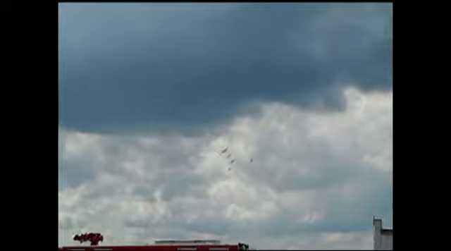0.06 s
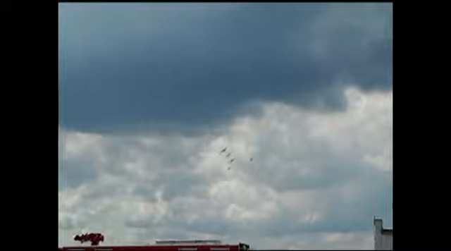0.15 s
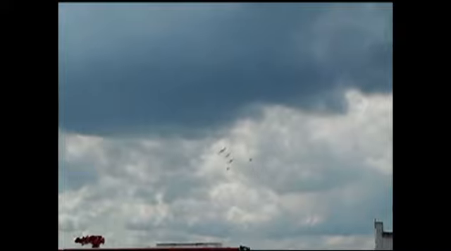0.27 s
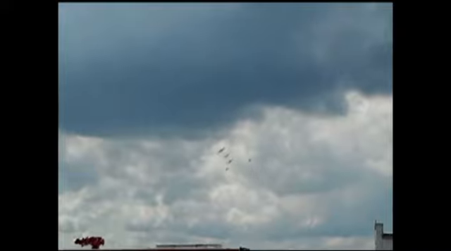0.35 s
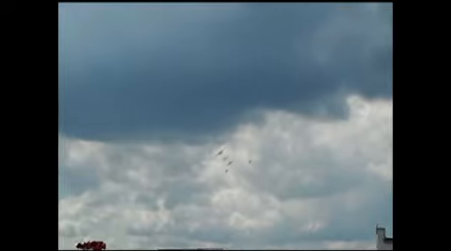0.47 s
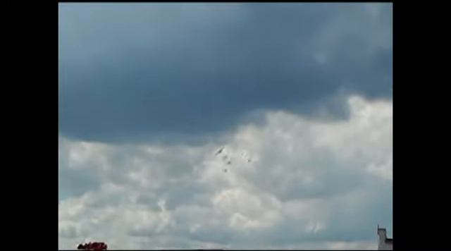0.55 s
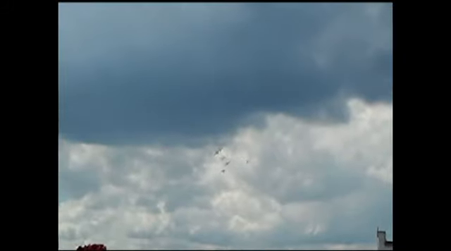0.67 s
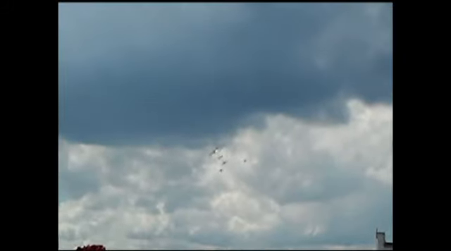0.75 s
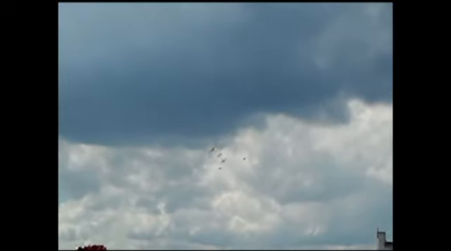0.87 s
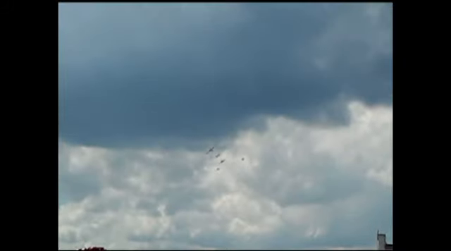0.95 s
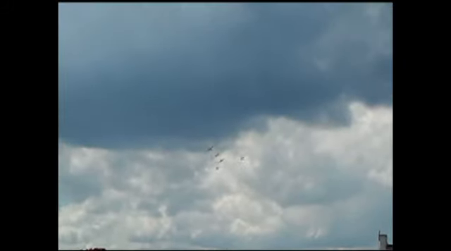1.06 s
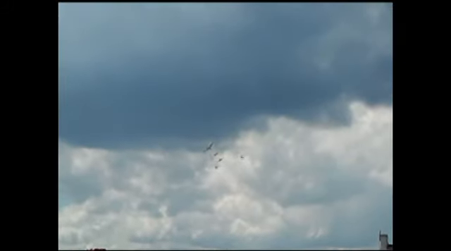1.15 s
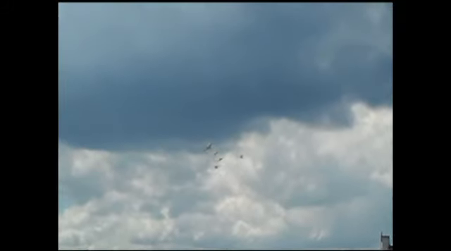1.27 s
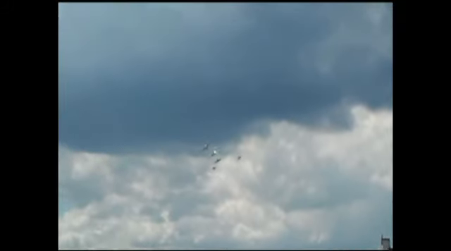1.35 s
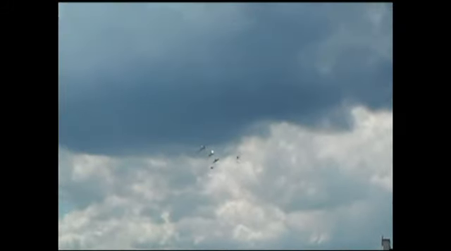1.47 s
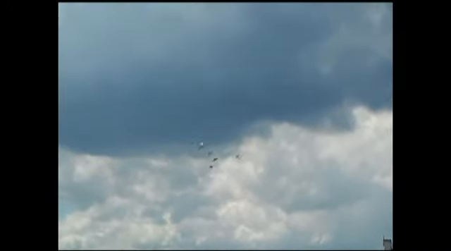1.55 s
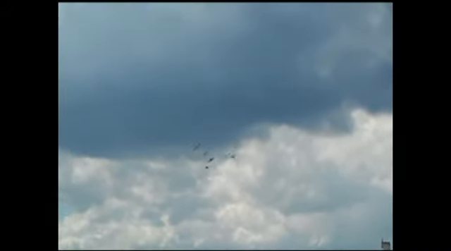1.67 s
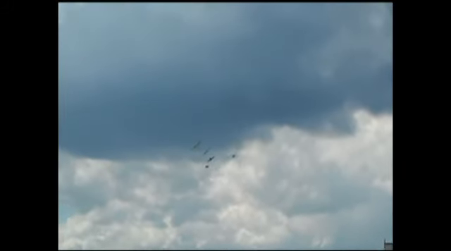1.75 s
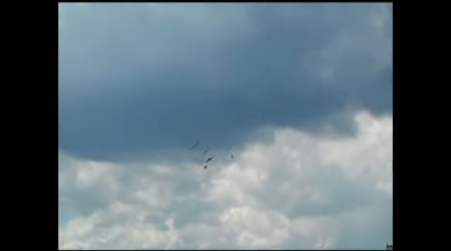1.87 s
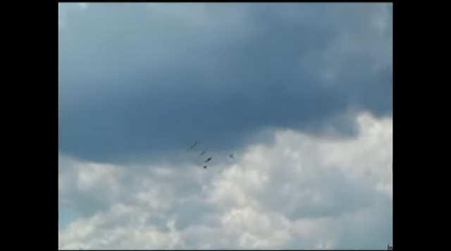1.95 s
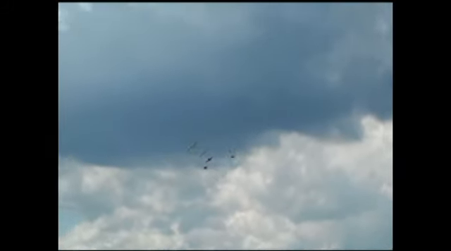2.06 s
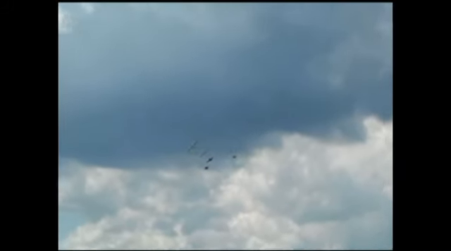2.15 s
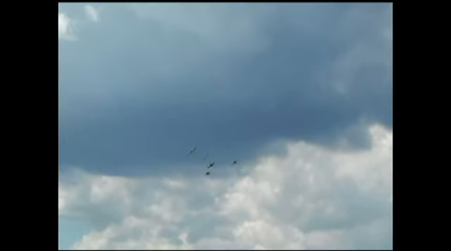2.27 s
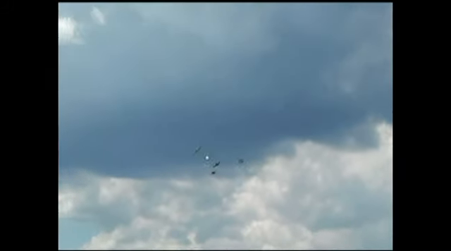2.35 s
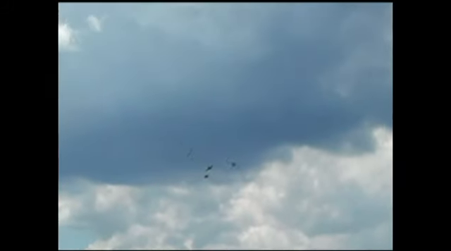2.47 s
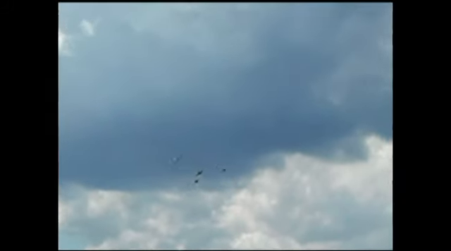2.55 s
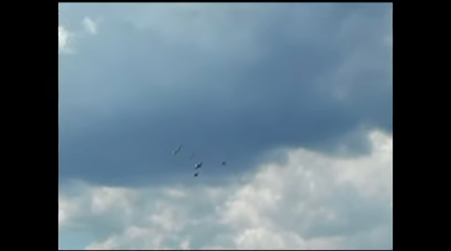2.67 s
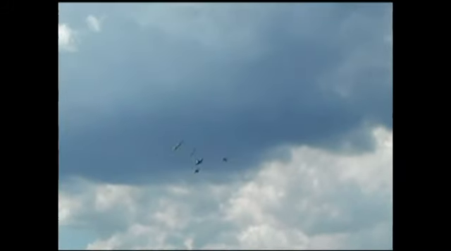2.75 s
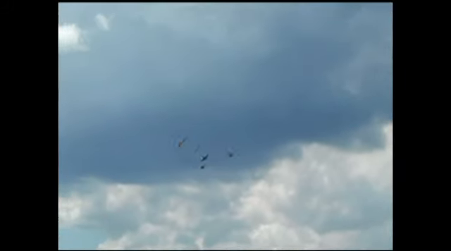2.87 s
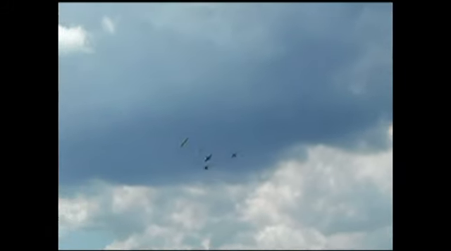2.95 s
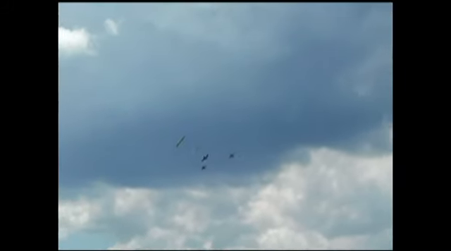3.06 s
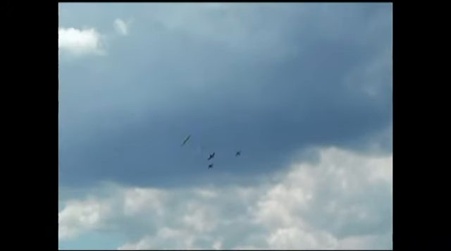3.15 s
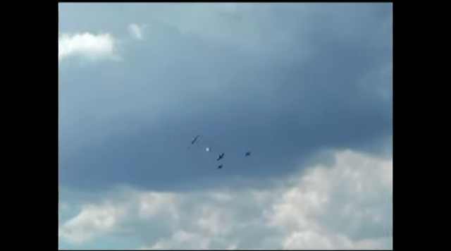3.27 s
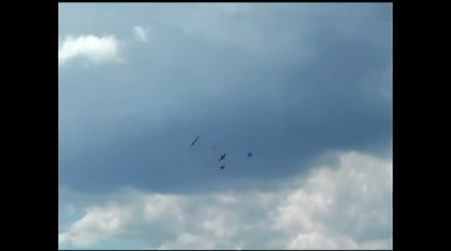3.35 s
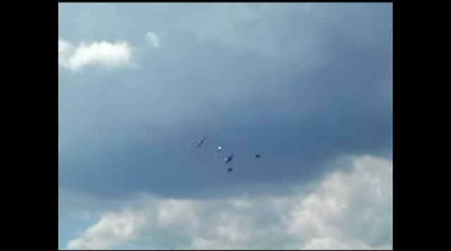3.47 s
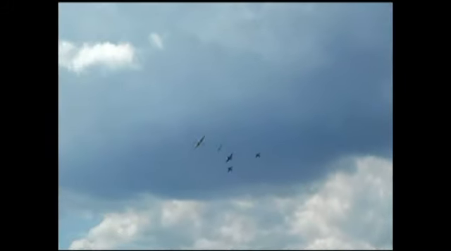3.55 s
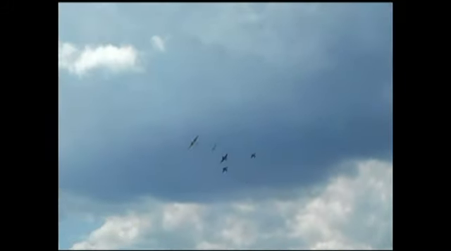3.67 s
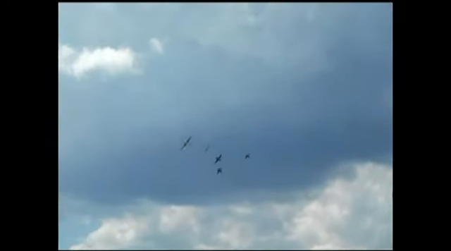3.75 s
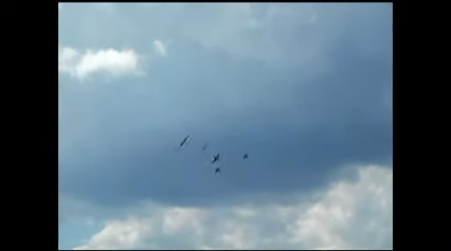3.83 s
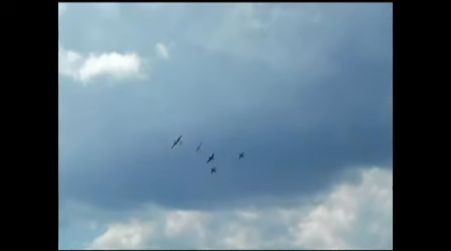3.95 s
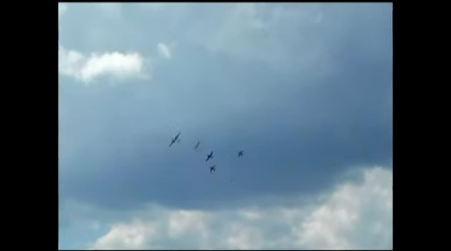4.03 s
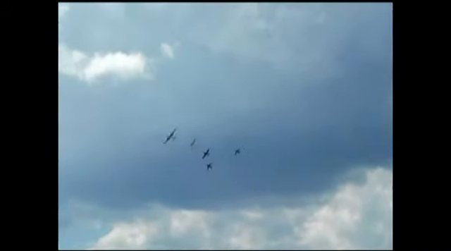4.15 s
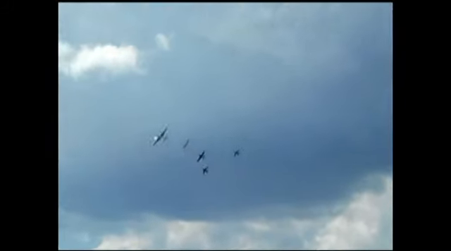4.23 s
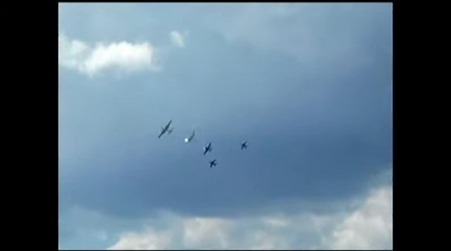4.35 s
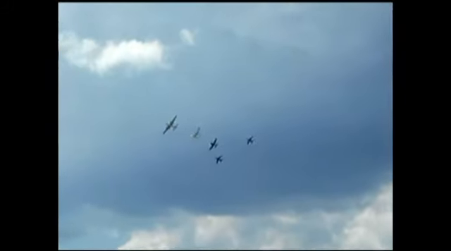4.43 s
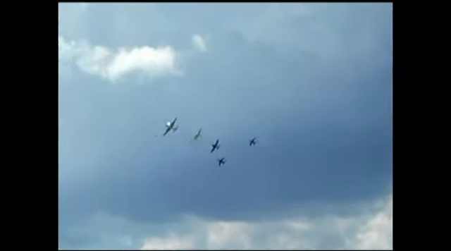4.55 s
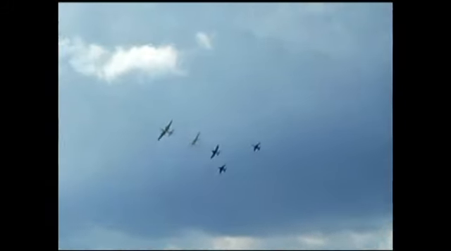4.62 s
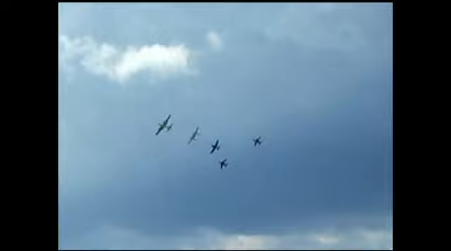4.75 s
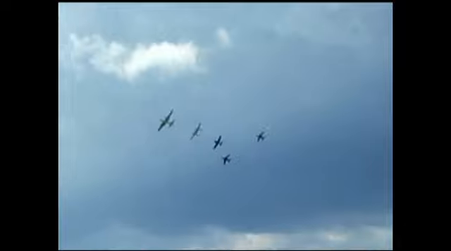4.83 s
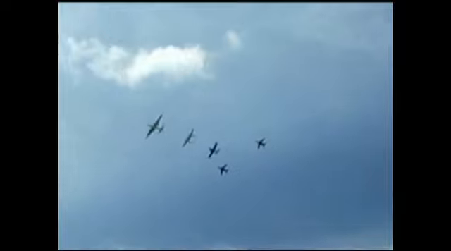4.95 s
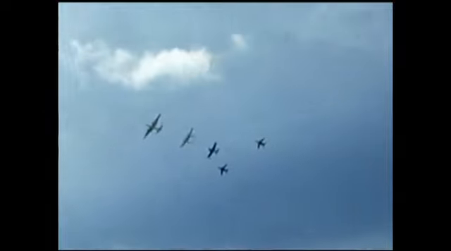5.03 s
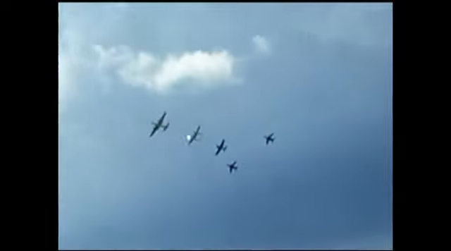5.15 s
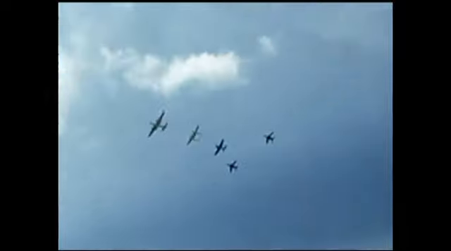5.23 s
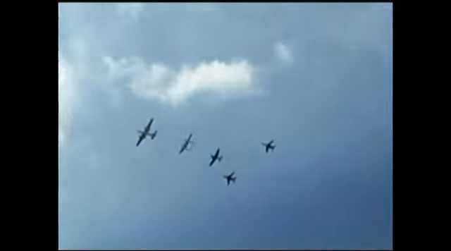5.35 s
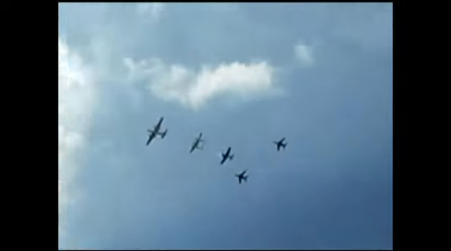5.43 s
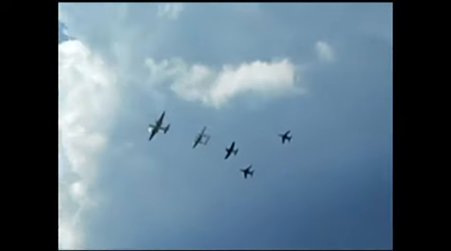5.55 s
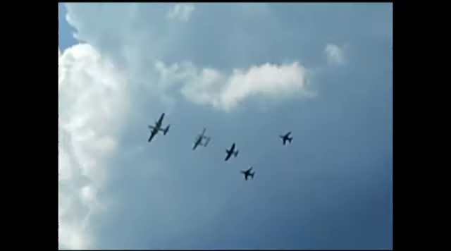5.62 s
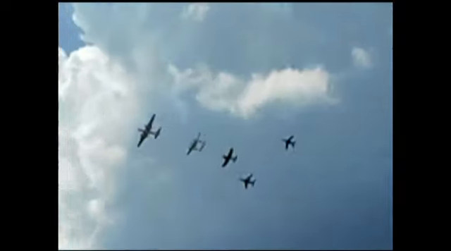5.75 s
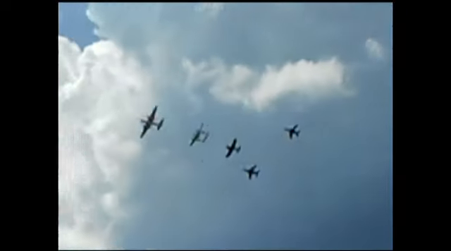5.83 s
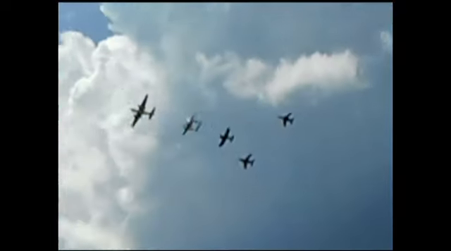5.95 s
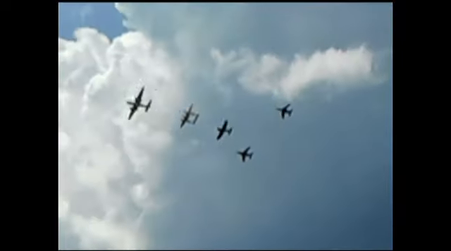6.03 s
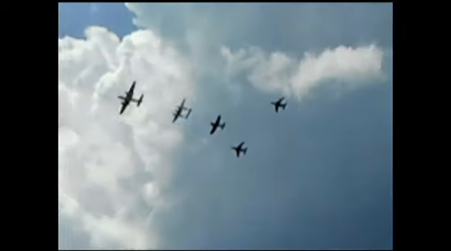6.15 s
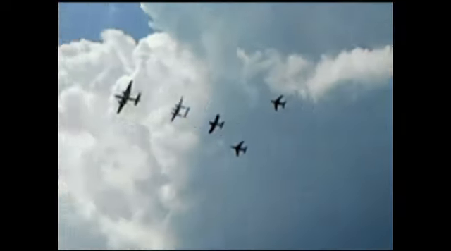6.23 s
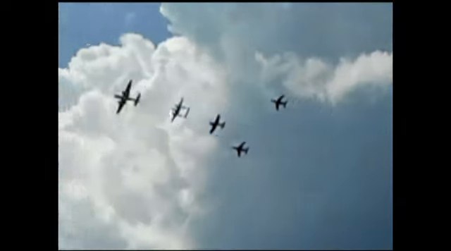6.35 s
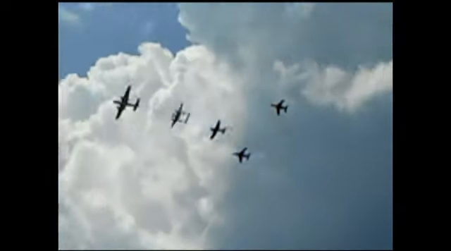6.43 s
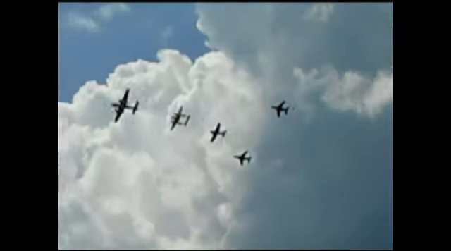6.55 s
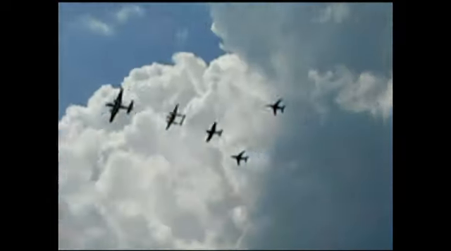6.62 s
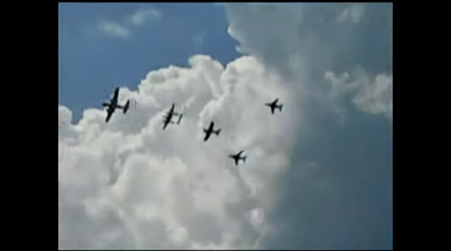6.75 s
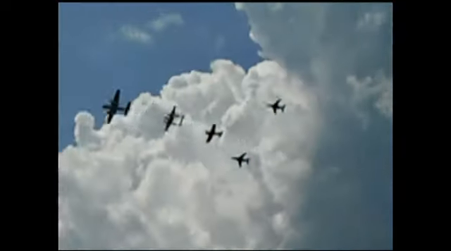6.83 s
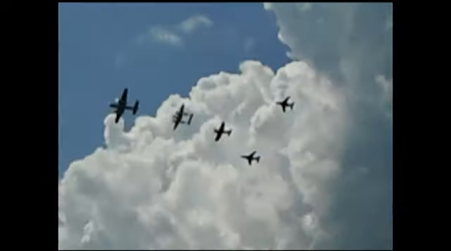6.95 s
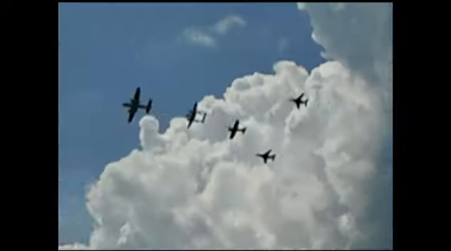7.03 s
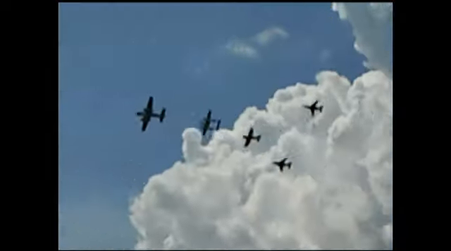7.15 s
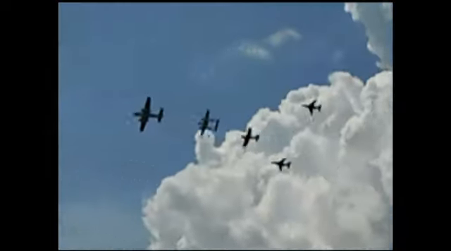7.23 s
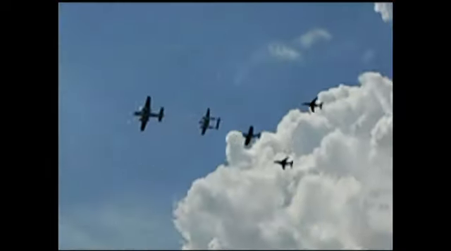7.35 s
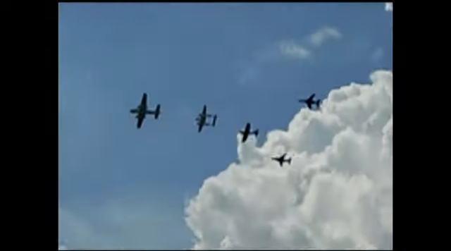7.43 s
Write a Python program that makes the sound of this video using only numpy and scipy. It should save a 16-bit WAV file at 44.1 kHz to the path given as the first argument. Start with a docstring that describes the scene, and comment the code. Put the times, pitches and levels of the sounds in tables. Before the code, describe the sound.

Outdoors at an airfield, five piston-engined propeller planes approach in formation. Their distant drones beat against each other, then swell into a coarse, fluttering exhaust roar with brief howls, the pitch slowly sinking. Deep air rumble arrives midway, followed by thin gliding engine whines. Dry little ticks click close to the microphone in the second half, over faint steady hiss. It ends at its loudest, nearly overhead.

```python
"""Five piston-engined propeller planes approach an airfield until nearly overhead: harmonic drones beat and sink.
Exhaust roar (engine orders plus puffing noise) and exhaust howls swell, combed by echoes; air rumbles below.
Two supercharger whines, gliding tones, blur as they near. Sharp ticks at the microphone (decaying noise),
faint fizzes (short swells of crackly high treble hiss), steady hiss and a thin whistle."""
import sys
import numpy as np
from scipy import signal
from scipy.fft import rfft, irfft, next_fast_len
from scipy.io import wavfile
from scipy.ndimage import uniform_filter1d

SR = 44100
rng = np.random.default_rng(int(sys.argv[2]) if len(sys.argv) > 2 else 0)


def to_wav(s):
    """Save 16-bit WAV."""
    ch = np.atleast_2d(s).T  # columns
    pcm = np.round(np.clip(ch, -1, 1) * 32767)  # PCM
    wavfile.write(sys.argv[1], SR, pcm.astype(np.int16))


N = 330309
TIME = np.arange(N) / SR
FRAME_S = np.arange(N // 256 + 2) * 256 / SR
BIN_HZ = np.fft.rfftfreq(1024, 1 / SR)
EDGE_HZ = 14700

# straight flight: moment overhead, time to fly its own height, speed / speed of sound
OVERHEAD_S, HEIGHT_S, MACH = 7.517, 2.861, .2378
# without Doppler shift: lead firing tone (five per shaft turn), two supercharger pitches
FIRING_HZ, WHINE_HZ, LOW_WHINE_HZ = 124.56, 1964, 1588
# drone pitch of the other planes / lead firing tone
SECOND_RATIO, THIRD_RATIO, FOURTH_RATIO, FIFTH_RATIO = .673, .617, 1.462, .75
LEAD_DB = -2

# approach, ground echo lagging ever more: t/s, first reinforced f/Hz, nearness/1 (0 far, about 1 overhead)
PATH = [(0, 1250, 0), (1, 1150, .02), (2, 870, .1), (3, 715, .25), (4, 625, .45), (5, 535, .7),
        (6, 445, .9), (7, 375, .99), (7.49, 340, 1.02)]
# lead drone, before LEAD_DB: t/s, level/dB
LEAD_LEVEL = [(0.06, -23.5), (0.63, -23), (1.06, -32), (1.83, -35), (1.94, -48), (2.04, -32.5), (2.48, -32),
              (2.59, -37), (2.84, -30), (3.73, -23.5), (4.51, -29.5), (4.57, -25), (5.05, -30), (5.27, -42),
              (5.33, -27.5), (5.8, -27.5), (5.96, -25), (6.11, -24), (6.9, -19.5), (7.06, -20.5),
              (7.17, -21), (7.33, -17.5), (7.46, -20.5)]
# other planes' drones: t/s, level/dB
SECOND_LEVEL = [(0, -38.5), (.6, -35), (1.8, -42), (3.2, -45.5), (4.3, -35), (5.6, -38), (6.5, -31),
                (7.05, -29.5), (7.49, -29.5)]
THIRD_LEVEL = [(0, -42), (2.3, -35), (3.15, -42.5), (3.95, -29.5), (5.25, -33), (5.9, -44.5), (7.49, -44.5)]
FOURTH_LEVEL = [(0, -47), (1.4, -44.5), (2, -49), (2.7, -46), (4.2, -45), (5.3, -38), (6.1, -42),
                (6.7, -54.5), (7.49, -56)]
FIFTH_LEVEL = [(0, -63), (4.1, -53), (4.7, -41.5), (5.3, -38.5), (5.8, -48.5), (7.49, -43.5)]
# weaker low orders of the lead engine: multiple of shaft rate/1, far level/dB, overhead level/dB
LEAD_ORDERS = [(1, -55, -50), (2, -54, -40), (3, -56.5, -42), (4, -44, -38.5), (6, -45, -41.5),
               (7, -45, -36), (10, -56.5, -45.5), (11, -58.5, -35.5), (12, -59.5, -46), (15, -54, -48),
               (16, -57, -49.5)]
# propeller harmonics relative to each drone: multiple/1, far level/dB, overhead level/dB
SECOND_ORDERS = [(1, 0.5, 0.5), (2, -6, -8), (3, -14.5, 6.5), (4, -24, -0.5)]
THIRD_ORDERS = [(1, -1.5, 2.5), (2, -10, -3.5), (3, -10.5, -22)]
FOURTH_ORDERS = [(1, 0, 0), (2, -9.5, -2), (3, -8.5, 0)]
FIFTH_ORDERS = [(1, -3.5, -2.5), (2, -2, -1), (4, -5.5, -4.5)]
# blooms of single lead orders: middle t/s, length/s, multiple of shaft rate/1, level/dB
FLARES = [(.3, .8, 9, -45), (2.8, 1.5, 9, -42), (4.35, .65, 9, -41), (6.35, .75, 9, -37),
          (7.0, .5, 9, -33.5), (5.87, .33, 10, -32), (6.22, .2, 10, -34), (5.88, .45, 12, -32),
          (7.01, .35, 12, -28.5), (7.39, .2, 12, -35), (4.618, .35, 13, -40), (6.1, .8, 13, -37.5),
          (7.02, .29, 13, -25.5), (7.39, .22, 13, -24), (6.2, 1.1, 15, -38), (7.39, .18, 15, -34),
          (5, 1.0, 7, -38), (5.173, 0.13, 3, -28)]
# throb, exhaust, rasp and air rush bands of the roar: lower f/Hz, upper f/Hz
ROAR_BANDS = [(230, 480), (480, 1000), (1000, 2000), (2000, 5000)]
# growth of each band: far level/dB, overhead level/dB, lateness/1 (1 even, more blooms late)
ROAR_GROWTH = [(-42, -21.5, 2.17), (-39, -25.5, 1.07), (-48.5, -27.5, 0.85), (-63.5, -32.5, 1.21)]
# relative roar spectrum far off and overhead: f/Hz, density level/dB
FAR_COLOUR = [(20, -21.5), (60, -12), (100, -12.5), (150, 6.5), (205, 3.5), (290, 6), (390, -5), (560, -1),
              (900, -14.5), (1750, -16.5), (2400, -26.5), (3000, -38.5), (4500, -63.5), (7000, -108)]
NEAR_COLOUR = [(20, -25), (60, -10.5), (100, 0), (190, 5.5), (300, 6), (700, -5), (1100, -6.5), (2200, -7),
               (2600, -10.5), (3100, -22.5), (4300, -24.5), (5500, -32), (7000, -73), (12000, -101)]
# roar surges and lulls, air bending more or less sound down:
# middle t/s, length/s, lift level/dB, centre f/Hz, width/octaves
SURGES = [(0.497, 0.48, 6.5, 590, 0.4), (1.1, 3.6, 4.5, 1500, 0.61), (1.4, 0.96, -2, 320, 0.37),
          (1.8, 1.1, -2, 697, 0.65), (2.5, 0.27, 3, 706, 0.18), (2.945, 0.65, 8.5, 732, 0.29),
          (3.155, 0.67, 4.5, 2410, 1.6), (3.346, 0.78, 5, 1235, 0.091), (4.35, 2.27, 5.5, 652, 0.57),
          (4.65, 0.22, 3, 992, 5.6), (5.28, 0.4, 1.5, 800, 2.7), (5.1, 1.7, 6, 710, 0.12),
          (6.1, 0.92, 5, 602, 0.23), (5.762, 0.089, 6, 1000, 4.4), (5.853, 0.1, 3.5, 800, 3.5),
          (5.905, 0.36, 2, 400, 3.3), (6.314, 0.045, 4.5, 1500, 3), (6.794, 0.12, 2, 1500, 1.7),
          (6.9, 0.12, 5, 1710, 2.5), (7.096, 0.087, 4, 1520, 1.9), (7.19, 0.096, 0.5, 447, 1.2),
          (7.303, 0.064, 5.5, 1700, 5.5), (7.312, .05, 9, 2100, .07), (7.392, 0.13, 3.5, 653, 2.6)]
# swells of narrow exhaust howls: middle t/s, length/s, level/dB, multiple of shaft rate/1
HOWLS = [(0.506, 0.79, -40.5, 18.5), (2.98, 0.41, -38, 22.3), (3.3, 3.8, -42.5, 18.2),
         (4.246, 0.26, -39, 20), (4.914, 0.12, -26.5, 18), (5.204, .3, -42, 23), (6.147, 0.26, -24, 17.8),
         (6.53, 0.44, -34.5, 17.8), (6.876, 0.33, -35, 30.4), (7.064, 0.17, -29, 17.7),
         (7.335, .24, -27, 26.4)]
# puffs of wind on the microphone: middle t/s, length/s, level/dB
GUSTS = [(.87, 0.2, -39), (1.15, 0.089, -38)]
# relative hiss spectrum: f/Hz, density level/dB
HISS = [(100, 0), (4000, 1), (7500, -4.5), (9000, 1), (10500, 4.5), (12000, -1), (14500, -9)]
# faint treble fizzes, relative: rise t/s, length/s, level/dB, centre f/Hz
FIZZES = [(2.479, 0.051, -66, 10500), (3.08, 0.24, -68, 11000), (3.592, 0.13, -57, 10300),
          (3.768, 0.25, -62, 10500), (4.596, 0.11, -61, 10500), (5.255, 0.032, -58, 11200),
          (5.49, 0.049, -61, 9500), (6.181, 0.15, -57, 10600), (6.44, 0.33, -63.5, 10200),
          (7.173, 0.091, -54, 8800), (7.399, 0.028, -54.5, 9300)]
# ticks: t/s, peak level/dB, relative lower treble level/dB, relative top treble level/dB
TICKS = [(2.5651, -30, -22, -6), (3.9656, -34, -12, -5), (4.2395, -15.5, -9, -9), (4.4566, -16, -22, -15),
         (4.6505, -13, -5, -4), (4.8855, -15.5, -27, -6), (4.9904, -10, -19, -6), (5.193, -19, -32, -14),
         (5.3366, -10, -13, -10), (5.568, -12, -21, -8), (5.7104, -16, -12, -9), (5.9574, -20.5, -14, -12)]
# superchargers: t/s, level/dB
WHINE_LEVEL = [(0, -80), (3.4, -60), (4.2, -52), (4.55, -44), (4.8, -47), (5.15, -48), (5.4, -42),
               (5.6, -45), (6.05, -37.5), (6.2, -41), (6.33, -35.5), (6.5, -46), (6.85, -38), (7.49, -44)]
LOW_WHINE_LEVEL = [(0, -80), (5.4, -52), (5.8, -36.5), (6.0, -37.5), (6.4, -46), (7.49, -52)]


def amp(db):
    """Decibels to gain."""
    return 10 ** (np.asarray(db) / 20)


def unit(x):
    """Scale to rms 1."""
    return x / np.sqrt(np.mean(x ** 2) + 1e-20)


def curves(rows, t=TIME):
    """Every column of a table, linear in time."""
    s, *columns = np.transpose(rows)
    return [np.interp(t, s, c) for c in columns]


def read(points, hz):
    """A spectrum, linear in log frequency."""
    f, value = np.transpose(points)
    return np.interp(np.log(hz + 1), np.log(f + 1), value)


def wander(rate_hz):
    """Smooth random motion of rms 1: noise at 200 Hz through a Gaussian low-pass."""
    f = np.fft.rfftfreq(2048, 1 / 200)
    lowpass = np.exp(-(f / rate_hz) ** 2)
    slow = unit(irfft(rfft(rng.standard_normal(2048)) * lowpass))
    return np.interp(TIME, np.arange(2048) / 200, slow)


def coloured(points):
    """Steady noise of rms 1 with the given spectrum."""
    size = next_fast_len(N, True)
    gain = amp(read(points, np.fft.rfftfreq(size, 1 / SR)))
    return unit(irfft(rfft(rng.standard_normal(size)) * gain, size)[:N])


def narrow_noise(turns, width_hz):
    """Fuzzy tone of about rms 1: the phase carries a random complex envelope."""
    envelope = wander(width_hz) + 1j * wander(width_hz)
    return (envelope * np.exp(2j * np.pi * turns)).real


def frames(x):
    """Short-time spectra (frames, bins) of mean power 1."""
    z = signal.stft(x, nperseg=1024, noverlap=768)[2].T[:len(FRAME_S)]
    return z / np.sqrt(np.mean(abs(z) ** 2))


def swell(middle_s, length_s, t=TIME):
    """Rounded rise, hold and fall of height 1; length between 1/e points."""
    return np.exp(-abs(2 * (t - middle_s) / length_s) ** 4)


def doppler(overhead_s):
    """Pitch factor of a plane overhead at the given moment."""
    ahead = overhead_s - TIME
    return 1 + MACH * ahead / np.hypot(ahead, HEIGHT_S)


def closeness(t):
    """Falling log distance: 0 at the start, 1 overhead."""
    distance = np.hypot(OVERHEAD_S - t, HEIGHT_S) / HEIGHT_S
    return np.clip(1 - np.log(distance) / np.log(distance[0]), 0, 1)


def drone(turns, orders, fade_db, waver, echo=0, bloom=3):
    """Low engine harmonics, faded and bent by turbulent air; a ground echo, if any, sweeps a notch across."""
    peak_hz, near = curves(PATH)
    echo_turns = np.gradient(turns) * SR / peak_hz
    abeam = np.minimum(near, 1) ** bloom  # upper harmonics beam sideways: overhead balance comes late
    out = np.zeros(N)
    for k, far_db, near_db in orders:
        level = amp(far_db + (near_db - far_db) * abeam + fade_db * wander(5.3))
        phase = 2 * np.pi * (k * turns + rng.random()) + waver * np.sqrt(k) * wander(4.3)
        echo_phase = phase - 2 * np.pi * k * echo_turns
        out += level * np.sqrt(2) * (np.cos(phase) + echo * np.cos(echo_phase))
    return out


def drones(shaft):
    """Five engines at different speeds beat against each other."""
    firing = 5 * shaft
    lead = drone(firing, [(1, 0, 0)], fade_db=.4, waver=.03)
    second = drone(SECOND_RATIO * firing, SECOND_ORDERS, fade_db=2, waver=.22, bloom=12)
    third = drone(THIRD_RATIO * firing, THIRD_ORDERS, fade_db=1.4, waver=.32)
    fourth = drone(FOURTH_RATIO * firing, FOURTH_ORDERS, fade_db=2, waver=.35)
    fifth = drone(FIFTH_RATIO * firing, FIFTH_ORDERS, fade_db=2, waver=.3)
    out = amp(LEAD_DB + curves(LEAD_LEVEL)[0]) * lead
    out += amp(curves(SECOND_LEVEL)[0]) * second
    out += amp(curves(THIRD_LEVEL)[0]) * third
    out += amp(curves(FOURTH_LEVEL)[0]) * fourth
    out += amp(curves(FIFTH_LEVEL)[0]) * fifth
    return out + drone(shaft, LEAD_ORDERS, fade_db=1, waver=.07, echo=.62)


def exhaust(turns, jitter_turns, count):
    """Dense comb of engine orders, smeared by the wavering path through the air."""
    step = np.exp(2j * np.pi * (turns + jitter_turns * wander(4.4)))
    wave = np.zeros(N, complex)
    for phase in rng.random(count):  # each pass raises all orders by one and adds another
        wave = (wave + np.exp(2j * np.pi * phase)) * step
    z = frames(wave.real)
    return z / np.sqrt(np.mean(abs(z[:, BIN_HZ < 2000]) ** 2))


def surges():
    """Lift in dB over time and frequency; each surge favours one spectral region."""
    octaves = np.log2(BIN_HZ + 1)
    lift_db = 0
    for s, length, db, hz, width in SURGES:
        region = np.exp(-((octaves - np.log2(hz)) / width) ** 2)
        lift_db = lift_db + db * np.outer(swell(s, length, FRAME_S), region)
    return lift_db


def roar_field(wall_hz=575, patch_db=1.38, flutter_db=1.3):
    """Gain over time and frequency: air dulls far planes, two echoes comb them, turbulence flickers."""
    peak_hz, near = (c[:, None] for c in curves(PATH, FRAME_S))
    colour_db = (1 - near) * read(FAR_COLOUR, BIN_HZ) + near * read(NEAR_COLOUR, BIN_HZ)
    ground = .48 * np.exp(-(BIN_HZ / 1700) ** 2)
    wall = .13 * np.exp(-(BIN_HZ / 2800) ** 2)  # a surface close by
    ground_comb = 1 + ground * np.exp(2j * np.pi * BIN_HZ / peak_hz)
    wall_comb = 1 + wall * np.exp(2j * np.pi * BIN_HZ / wall_hz)
    colour = amp(colour_db) * abs(ground_comb * wall_comb)

    # lift each band from its own power to its target level
    lifts_db = []
    for (lo, hi), (far_db, near_db, late) in zip(ROAR_BANDS, ROAR_GROWTH):
        target_db = far_db + (near_db - far_db) * closeness(FRAME_S) ** late
        power = (colour[:, (BIN_HZ > lo) & (BIN_HZ < hi)] ** 2).sum(1)
        lifts_db.append(target_db - 10 * np.log10(power))
    centres = np.sqrt(np.prod(ROAR_BANDS, 1))
    blend = np.array([read(list(zip(centres, row)), BIN_HZ) for row in np.eye(len(centres))])

    patches = uniform_filter1d(rng.standard_normal(colour.shape), size=9, axis=0)
    patches = unit(uniform_filter1d(patches, size=10, axis=1))
    flutter = np.interp(FRAME_S, TIME, wander(50))[:, None] * np.minimum(BIN_HZ / 2500, 1)
    # nearing overhead, clean propeller tones take over from the turbulent bass
    yield_db = -4.5 * near ** 4 * read([(190, 0), (240, 1), (380, 1), (520, 0)], BIN_HZ)
    gain_db = np.transpose(lifts_db) @ blend + surges()
    return colour * amp(gain_db + patch_db * patches + flutter_db * flutter + yield_db)


def roar(shaft, throb=0.2, chop=0.13, lope=0.047):
    """Exhaust orders and turbulent gas noise that puffs with the firings, more crisply as planes near."""
    firing = 5 * shaft
    crisp = curves(PATH)[1]
    throbbing = throb * np.cos(4 * np.pi * shaft + .5 * wander(4.1))
    chopping = chop * np.cos(2 * np.pi * firing)
    puffs = 1 + crisp * (throbbing + chopping)
    gas = frames(puffs * rng.standard_normal(N))
    lead = exhaust(shaft, jitter_turns=.006, count=100)
    second = exhaust(SECOND_RATIO * firing, jitter_turns=.02, count=30)
    third = exhaust(THIRD_RATIO * firing / 2, jitter_turns=.012, count=60)
    orders = .7 * lead + .52 * second + .65 * third

    # power share of the orders against gas noise
    tonal = read([(20, 0), (230, 0), (330, .65), (700, .72), (1500, .5), (2400, 0)], BIN_HZ)
    tonal = tonal * np.interp(curves(PATH, FRAME_S)[1], [0, .5], [.65, 1])[:, None]
    z = np.sqrt(1 - tonal) * gas + np.sqrt(tonal) * orders
    # fixed tonal balance of the exhaust roar
    tone_db = read([(30, -5), (150, -1.5), (300, -.45), (480, -3.5), (1000, -.5), (3000, -3.5)], BIN_HZ)
    spectra = z * roar_field() * amp(tone_db) * np.sqrt(3 / 4)
    uneven = 1 + lope * np.cos(2 * np.pi * shaft)  # unequal cylinders: one beat per shaft turn
    return uneven * signal.istft(spectra.T, nperseg=1024, noverlap=768)[1][:N]


def howl(shaft, steady_db=-50, steady_order=18.2, fade_db=2.0, waver_rad=.6):
    """Narrow exhaust tones slide down with the engine note and swell in turn, wavering in the wind."""
    out = amp(steady_db) * narrow_noise(steady_order * shaft, width_hz=11)
    for s, length, db, multiple in HOWLS:
        level = amp(db + fade_db * wander(16)) * swell(s, length)
        phase = 2 * np.pi * multiple * shaft + waver_rad * wander(14)
        out += level * np.sqrt(2) * np.cos(phase)
    return out


def rumble(far_db=-46, near_db=-34.0, arrive_s=4.0, rise_s=0.16):
    """Moving air, deep and dull: two small gusts, then a step up as the planes arrive."""
    arrived = 1 / (1 + np.exp((arrive_s - TIME) / rise_s))
    level = amp(far_db + (near_db - far_db) * arrived)
    level += sum(amp(db) * swell(s, length) for s, length, db in GUSTS)
    return level * coloured([(12, -19), (22, -12.5), (30, -6.5), (45, -.5), (70, .5),
                             (110, -2.5), (250, -29.5), (1000, -84)])


def electronics(hiss_db=-66, whistle_db=-77, whistle_hz=13027):
    """The microphone's electronic hiss and a thin steady whistle."""
    whistle = np.sqrt(2) * np.sin(2 * np.pi * whistle_hz * TIME)
    return amp(hiss_db) * coloured(HISS) + amp(whistle_db) * whistle


def flares(shaft, waver_rad=.3):
    """Single lead-engine orders bloom; each order keeps one unbroken tone."""
    out = np.zeros(N)
    for order in sorted({round(row[2]) for row in FLARES}):
        level = sum(amp(db) * swell(s, length) for s, length, k, db in FLARES if round(k) == order)
        phase = 2 * np.pi * (order * shaft + rng.random()) + waver_rad * wander(3)
        out += level * np.sqrt(2) * np.cos(phase)
    return out


def fizz(grain_db=3, grains_per_s=1500, width_octaves=0.31, smooth=.6, gain_db=-1):
    """Faint fizzes: short swells of crackly high treble hiss, each with its own brightness."""
    out, size = np.zeros(N), 2 ** 15
    t, octaves = np.arange(size) / SR, np.log2(np.fft.rfftfreq(size, 1 / SR) + 1)
    for s, length, db, hz in FIZZES:
        grains = rng.standard_normal(size) * (rng.random(size) < grains_per_s / SR)
        crackle = unit(grains) + smooth * rng.standard_normal(size)
        band = np.exp(-((octaves - np.log2(hz)) / width_octaves) ** 2)
        grit = unit(irfft(rfft(crackle) * band))
        part = out[round((s - length / 2) * SR):][:size]
        part += (amp(db) * swell(length, length, t) * grit)[:len(part)]
    return amp(gain_db) * out * amp(grain_db * wander(60))


def ticks(decay_s=0.0006):
    """Dry decaying noise about a millisecond long, a little left, each with its own treble balance."""
    out, t = np.zeros((2, N)), np.arange(512) / SR
    hz = np.fft.rfftfreq(len(t), 1 / SR)
    lead_in = len(t) // 4  # room for filter ringing ahead of the onset
    for s, peak_db, body_db, top_db in TICKS:
        shared, own = rng.standard_normal((2, len(t))) * np.exp(-t / decay_s)
        colour = amp(read([(1500, 1), (3500, body_db - 10), (5500, body_db), (9000, -3), (11000, 2),
                           (12300, top_db), (15000, top_db)], hz))
        pair = [shared + .33 * own, .7 * shared - .33 * own]
        tick = irfft(rfft(np.roll(pair, lead_in, axis=1)) * colour)
        part = out[:, round(s * SR) - lead_in:][:, :len(t)]
        part += amp(peak_db) * tick / abs(tick.mean(0)).max()
    return out


def whine(pitch_hz, level, fade_db=3.5, blurred=.8, width_hz=45):
    """Thin supercharger whistle glides down, twinkles in moving air and blurs as it nears overhead."""
    jitter_hz = 22 * closeness(TIME) * wander(35)
    turns = np.cumsum(pitch_hz * doppler(OVERHEAD_S) + jitter_hz) / SR
    thin = np.sqrt(2) * np.sin(2 * np.pi * turns)
    blur = np.clip(blurred * curves(PATH)[1] ** 2, 0, 1)
    tone = np.sqrt(1 - blur) * thin + np.sqrt(blur) * narrow_noise(turns, width_hz)
    return amp(curves(level)[0] + fade_db * wander(14)) * tone


def scene():
    """All sources; only the ticks differ between the two channels."""
    shaft = np.cumsum(FIRING_HZ * doppler(OVERHEAD_S)) / SR / 5  # lead shaft turns
    whines = whine(WHINE_HZ, WHINE_LEVEL) + whine(LOW_WHINE_HZ, LOW_WHINE_LEVEL)
    planes = drones(shaft) + flares(shaft) + roar(shaft) + howl(shaft) + whines
    return planes + rumble() + electronics() + fizz() + ticks()


def record(dry):
    """Low-pass band limit, with short soft ends."""
    ends = signal.windows.tukey(N, .001)
    lowpass = signal.firwin(511, EDGE_HZ, window=("kaiser", 9), fs=SR)
    return signal.oaconvolve(dry * ends, lowpass[None], "same", axes=1)


dry = scene()
out = record(dry)
to_wav(out)
```